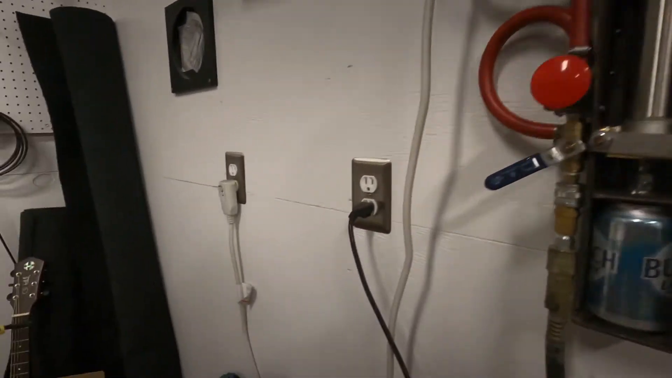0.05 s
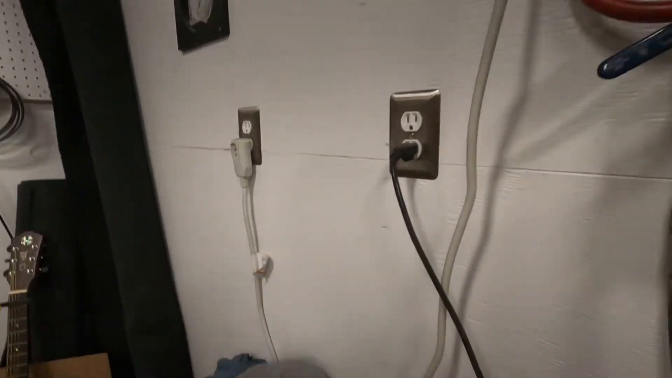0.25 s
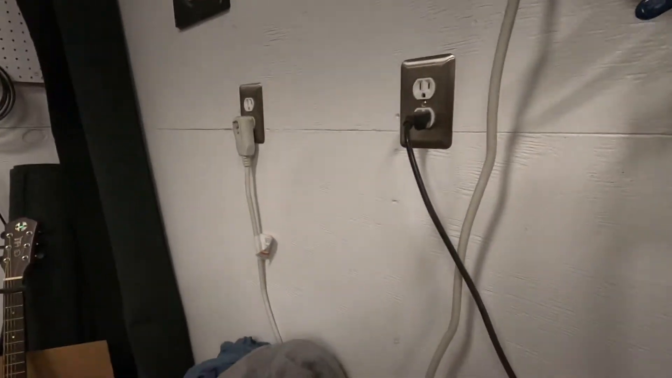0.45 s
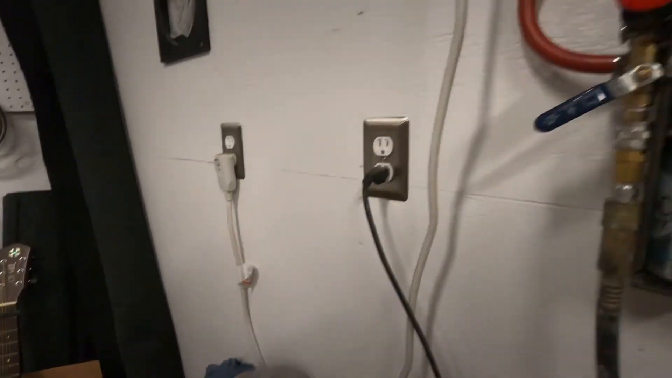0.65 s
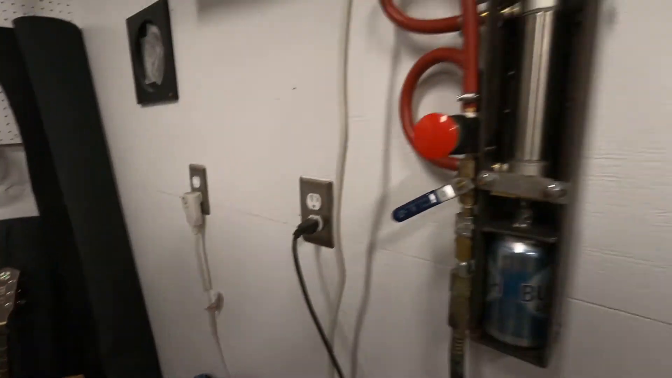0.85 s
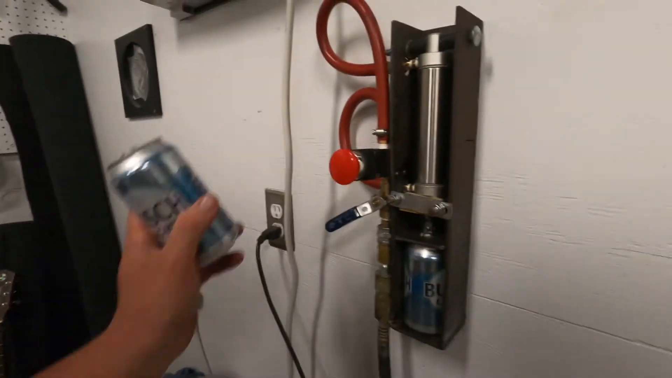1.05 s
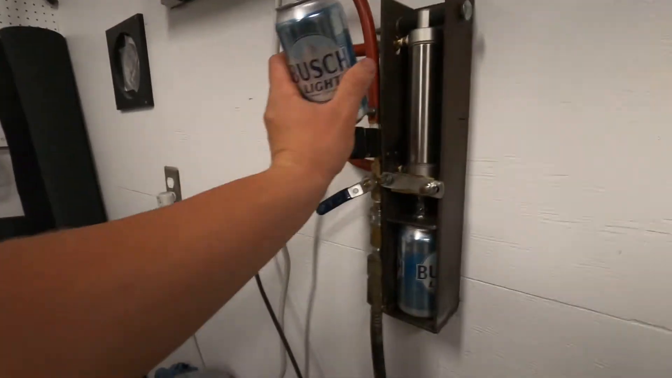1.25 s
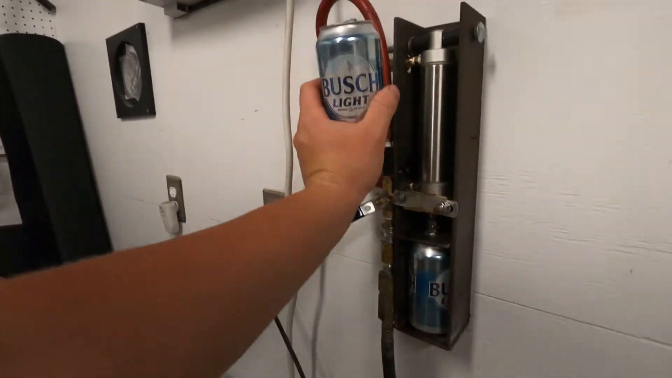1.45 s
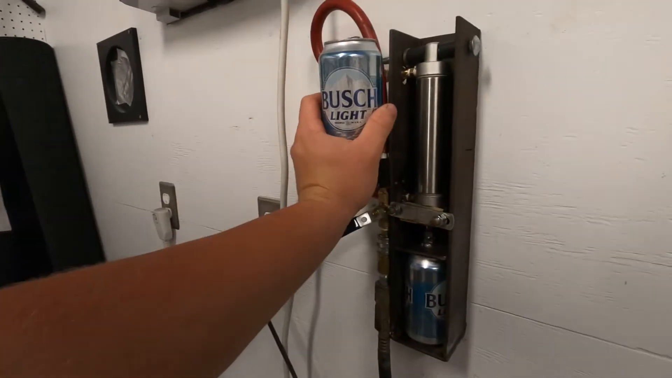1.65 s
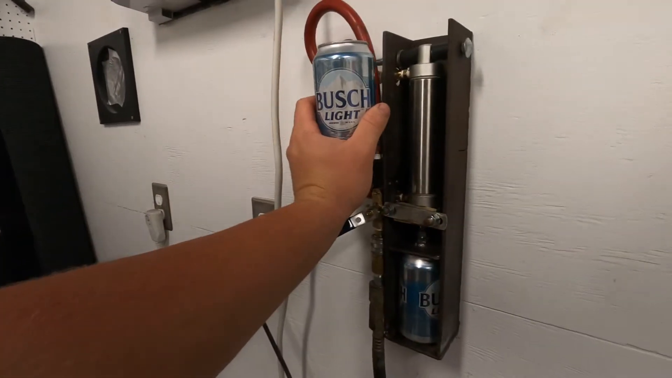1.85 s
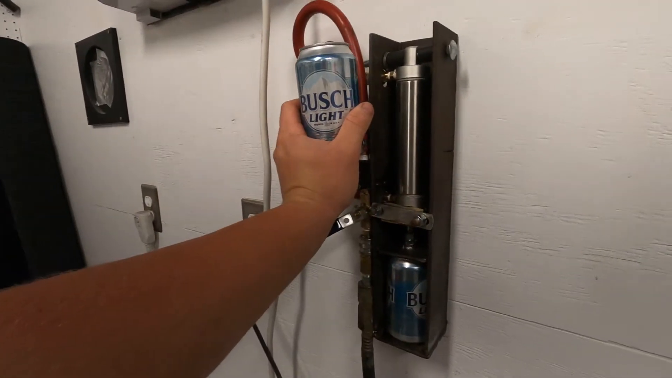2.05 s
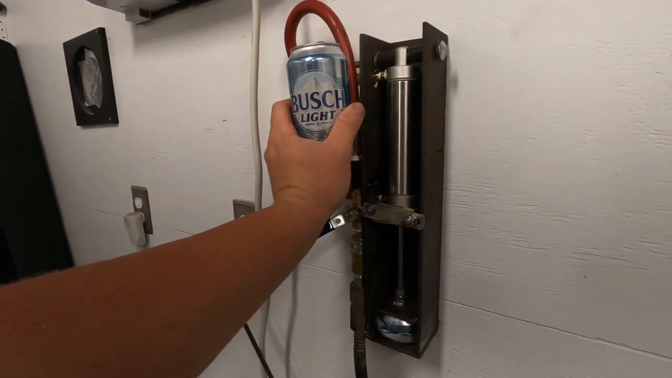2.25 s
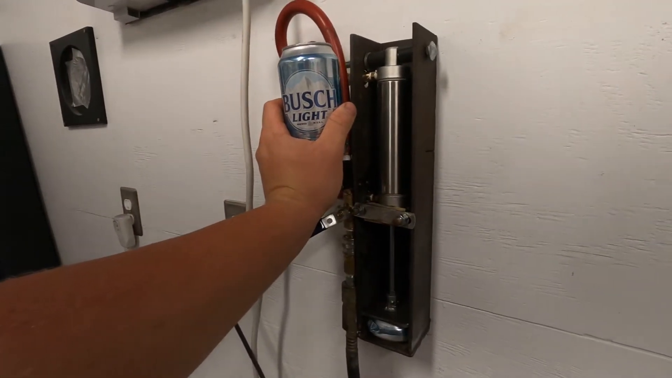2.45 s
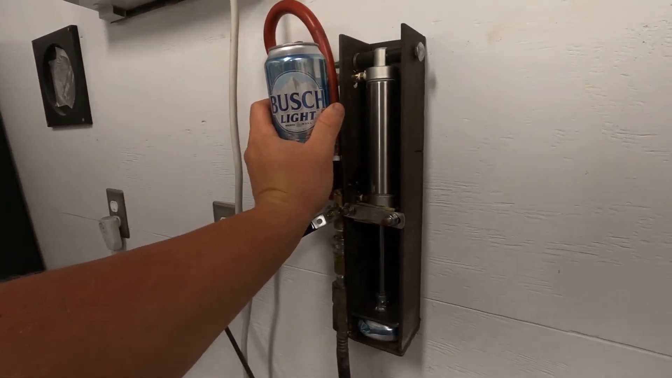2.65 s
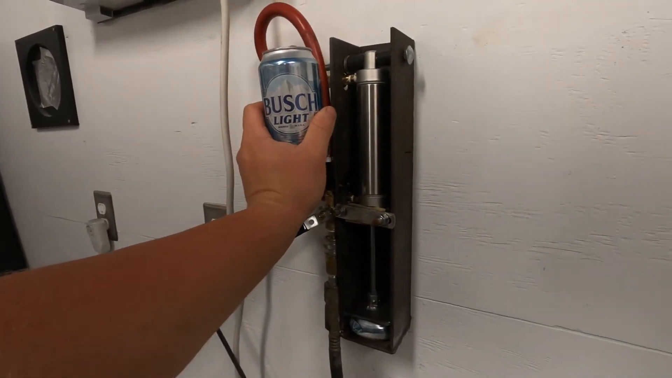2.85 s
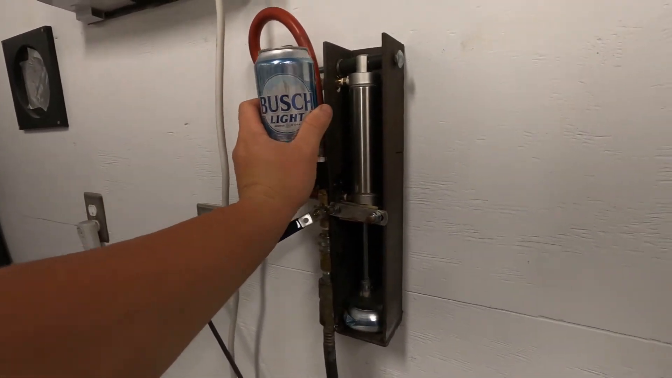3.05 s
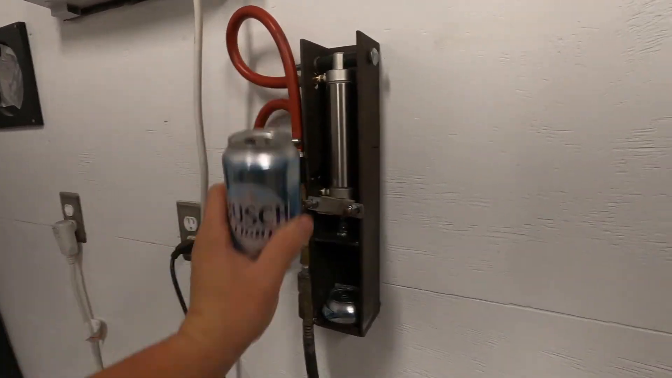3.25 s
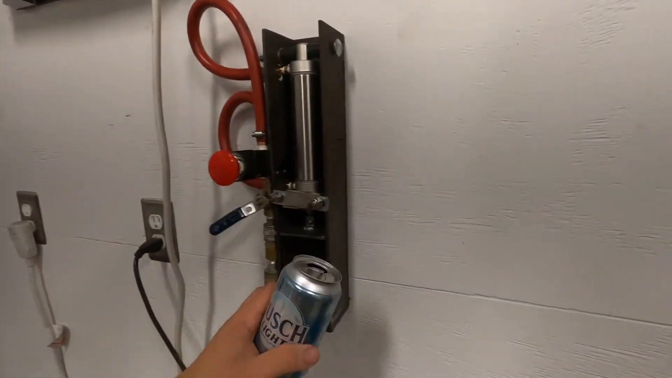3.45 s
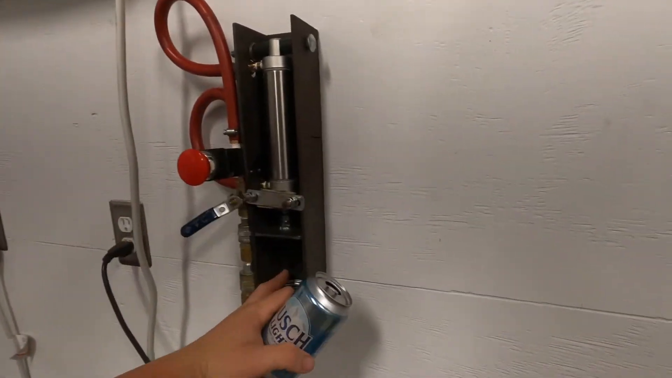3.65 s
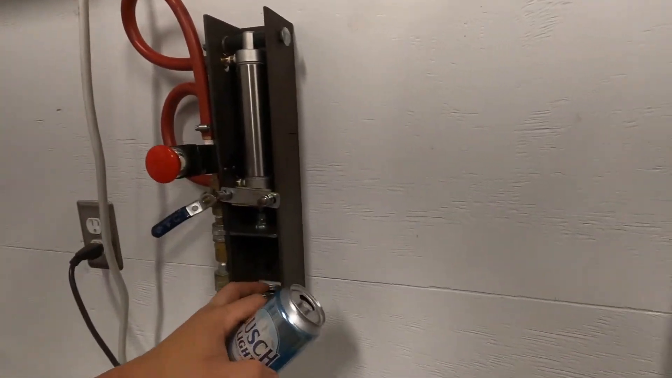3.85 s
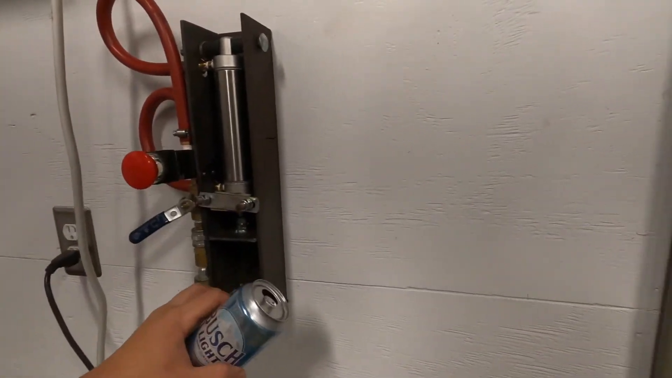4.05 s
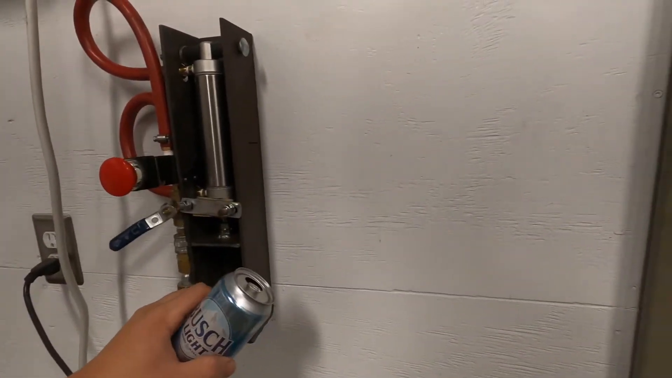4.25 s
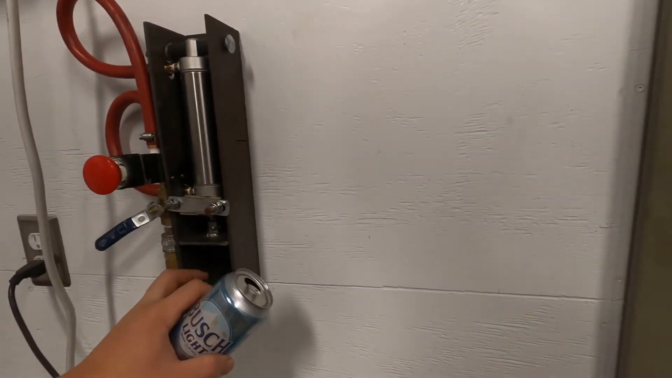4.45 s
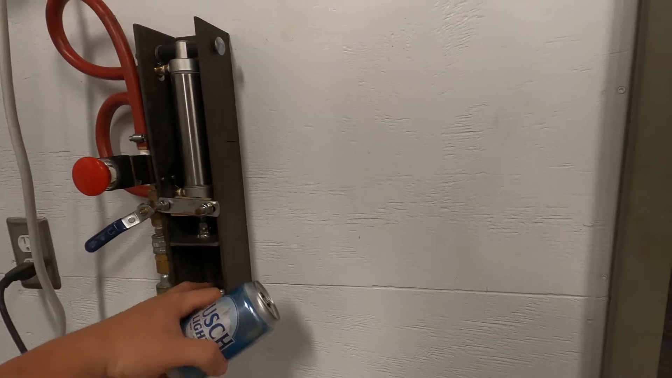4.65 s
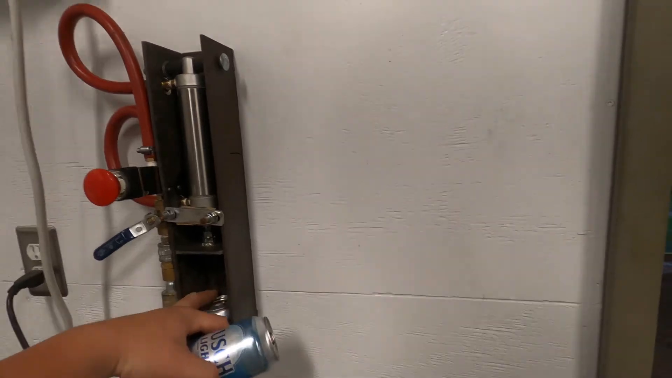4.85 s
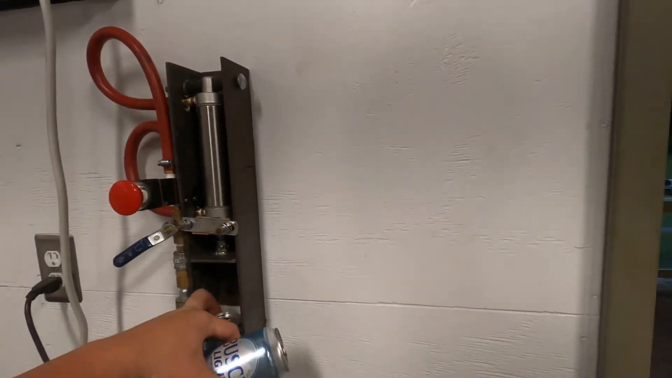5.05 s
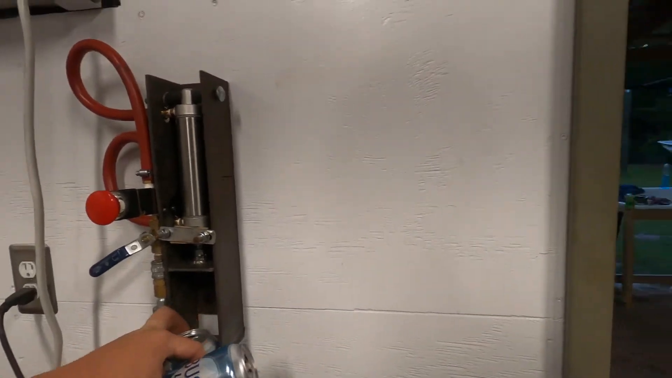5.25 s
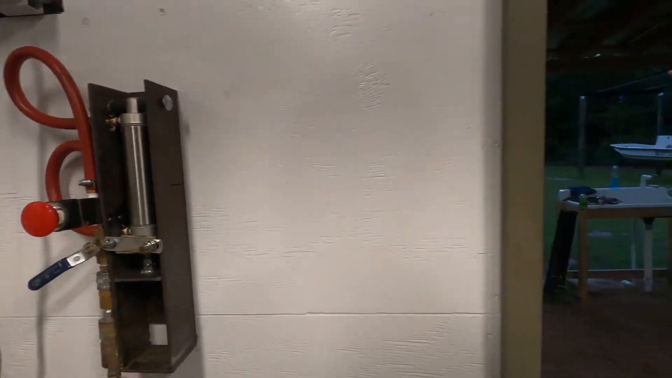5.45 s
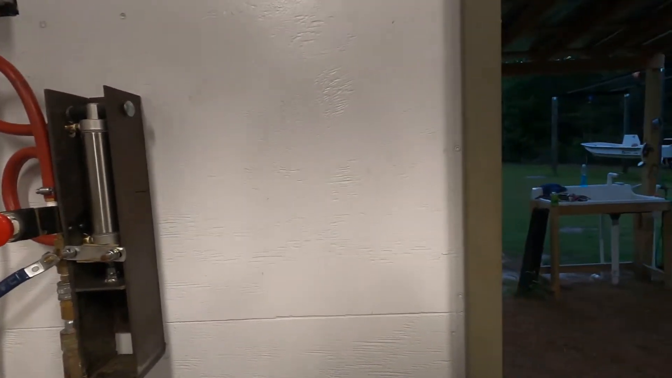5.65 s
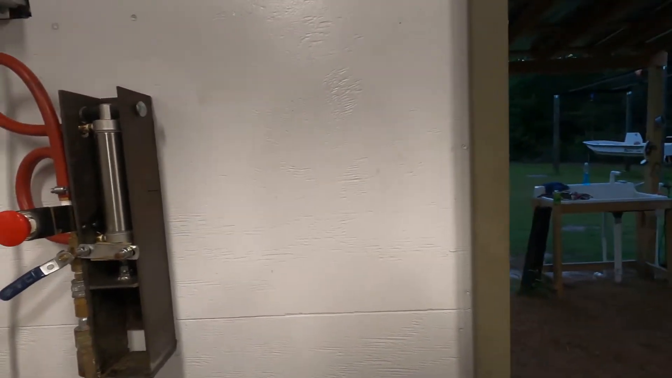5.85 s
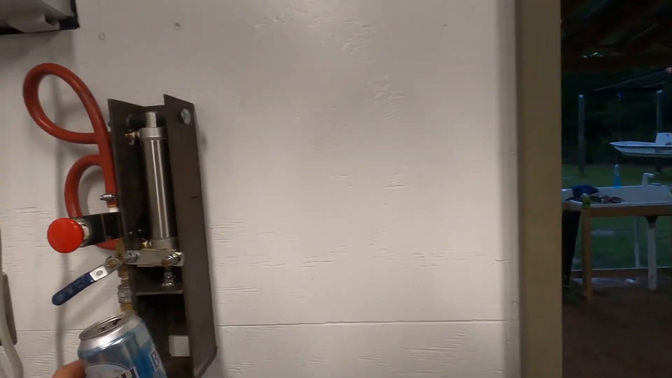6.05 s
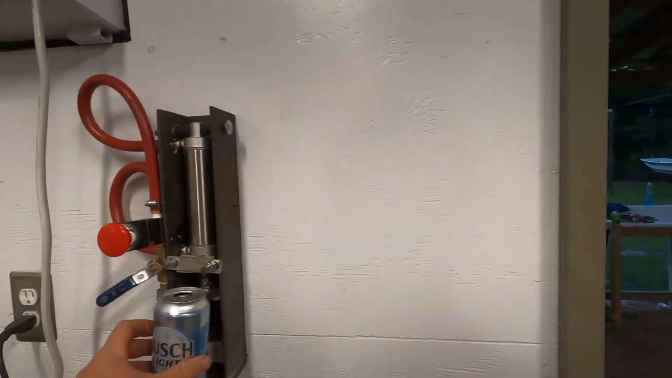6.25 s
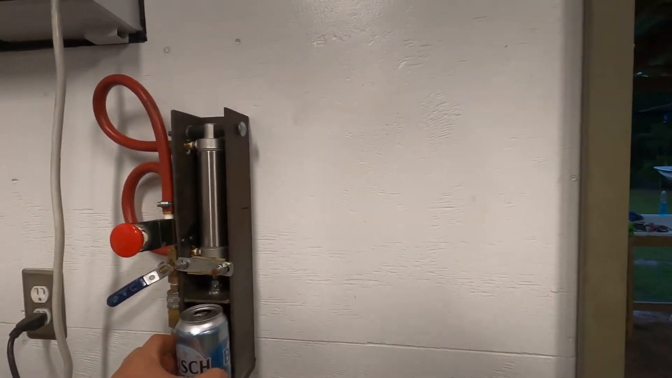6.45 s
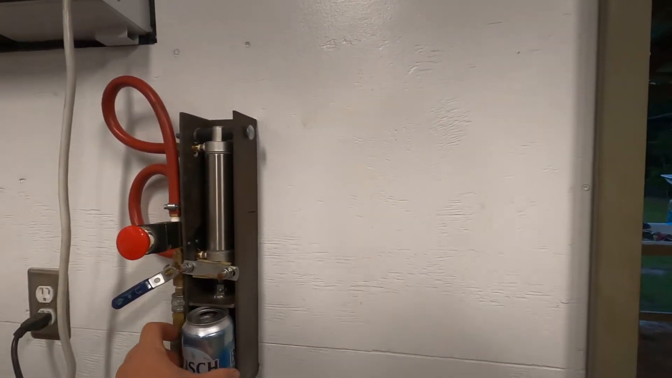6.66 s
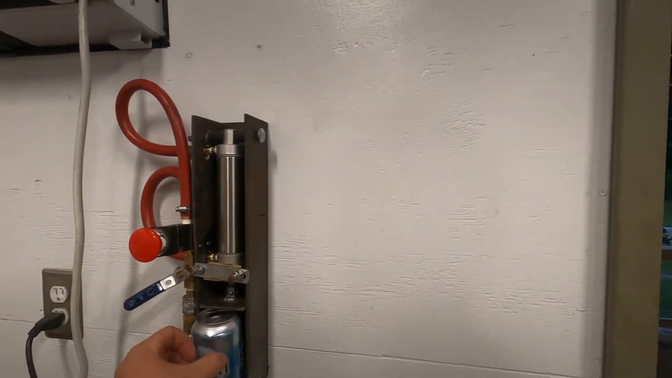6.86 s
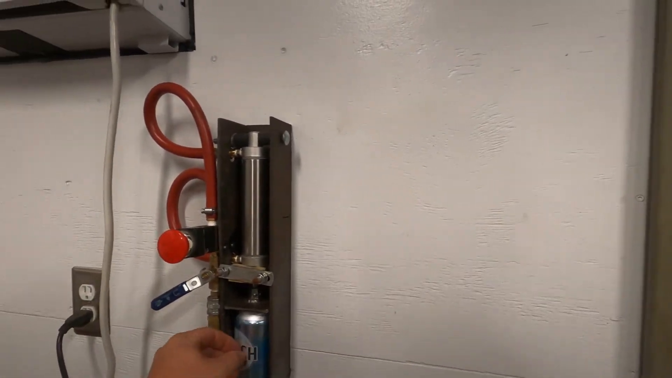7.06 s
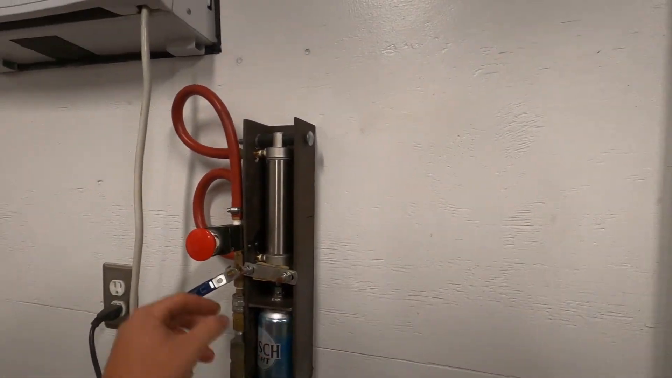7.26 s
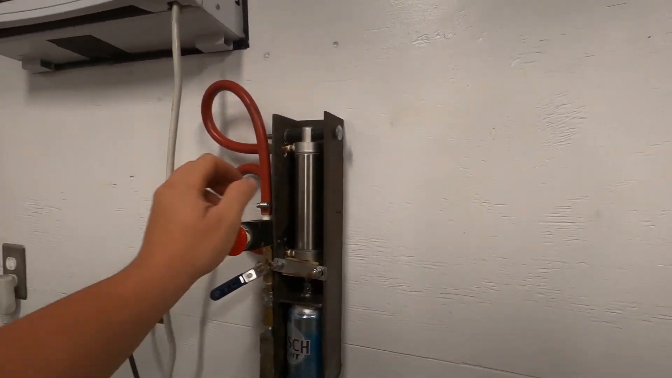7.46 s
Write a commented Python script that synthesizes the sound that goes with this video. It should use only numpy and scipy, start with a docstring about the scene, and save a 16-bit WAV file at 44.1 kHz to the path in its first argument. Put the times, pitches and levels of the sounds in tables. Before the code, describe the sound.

Two sharp air blasts surround the crunch of a drink can, followed by light metal scrapes and clatter in a workshop.

```python
"""Air-powered can crusher in a workshop

A hand-held stereo microphone, close to a wall-mounted air cylinder. Further off, a flat can lands in a bin.
The valve blasts, the ram buckles the next can and shakes the wall; a second blast, and it slams home.
The flat can is scraped out of the ringing steel frame and tossed in the bin; a fresh one squeaks in."""
import sys
import numpy as np
from scipy import signal
from scipy.fft import rfft, irfft
from scipy.io import wavfile

SR = 44100
rng = np.random.default_rng(int(sys.argv[2]) if len(sys.argv) > 2 else 0)


def int16_out(signal):
    """Quantize to a 16-bit WAV file."""
    q = np.round(np.clip(np.atleast_2d(signal).T, -1, 1) * 32767)
    wavfile.write(sys.argv[1], SR, q.astype(np.int16))


N = 331632
FREQ = np.fft.rfftfreq(N, 1 / SR)
TIME = np.arange(N) / SR

# The workshop's reverberation. Each row: frequency in Hz, t60 in seconds.
ROOM_T60 = [(100, 1.0), (250, 0.87), (700, 0.65), (2000, 0.68), (4000, 0.66), (8000, .55), (14000, 0.24)]
# Room tone: two noise spectra and faint electrical tones. Each row: frequency in Hz, relative level in dB.
HISS_COLOUR = [(150, -43), (250, -15), (537, -2), (636, -18), (925, -25), (1190, -6.5), (1620, -19),
               (1760, -9.5), (2440, -13), (2650, -3), (2990, -13.5), (4890, -3.5), (6420, -16.5),
               (9810, -14), (14500, -26.5)]
RUMBLE_COLOUR = [(12, -24), (20, -5), (51, -3), (182, -17), (221, -18), (247, -26.5), (300, -26.5),
                 (390, -38), (660, -120)]
WHINE_TONES = [(527.6, -70.5), (2595, -77), (2649, -72.5), (2708, -62)]
# The drift of the hiss, and gusts on the microphone. Each row: time in seconds, relative level in dB.
HISS_LEVEL = [(0, -50), (1.0, -45.5), (1.75, -52.5), (2.2, -61), (3.0, -58), (3.9, -58), (5.2, -50),
              (5.9, -51.5), (7.52, -49)]
GUSTS = [(0.02, -47), (0.8, -41), (1.3, -36), (2.45, -50), (3.5, -51), (4.9, -43), (5.56, -45)]
# Low thumps: handling, exhaust puffs, wall shudders, the piston's stop and the flat can's thuds.
# Each row: start in seconds, level in dB, length in seconds, top frequency in Hz.
THUMPS = [(0.066, -36, 0.007, 576), (1.308, -21.5, 0.024, 440), (1.355, -19.5, 0.018, 108),
          (1.811, -33, 0.045, 328), (2.231, -27.5, 0.075, 190), (3.141, -13, 0.02, 170),
          (3.236, -19, 0.016, 450), (3.249, -29, 0.11, 398), (5.031, -41, 0.088, 540),
          (5.979, -27, 0.045, 450)]

# Spectra of the cracks: heap in the bin, steel frame, whole can, its first pop, its buckling.
# Each row: frequency in Hz, relative level in dB.
HEAP_COLOUR = [(240, -24.5), (400, 3.5), (472, -14.5), (628, -9), (914, -7), (1130, -2.5), (2220, -10),
               (2860, -12), (4920, -27), (8320, -41), (12700, -54.5), (14500, -57)]
STEEL_COLOUR = [(210, -33.5), (350, -12.5), (541, -20), (751, -3.5), (1130, -2), (1420, -13), (2130, -8),
                (3200, -20), (3860, -19.5), (4720, -28), (5270, -26.5), (5780, -31.5), (8950, -36),
                (14500, -59)]
SHELL_COLOUR = [(240, -37), (400, -0.5), (574, -3.5), (900, -6), (1820, -0.5), (2950, -7), (3280, -13),
                (4110, -14.5), (4920, -21), (5540, -21), (7600, -25), (12500, -43), (14500, -44)]
POP_COLOUR = [(300, -26), (800, -17), (1300, -1), (1900, 2), (2800, 2), (4200, -6), (7000, -19),
              (14500, -35)]
BUCKLE_COLOUR = [(210, -30), (350, -1.5), (739, -2), (1690, 4.5), (2820, 0), (4100, -2), (4580, -7.5),
                 (5100, -8.5), (6450, -11.5), (7770, -14.5), (9230, -17), (12400, -27), (14500, -35)]
# What rings after a blow. Each row: frequency in Hz, relative level in dB, t60 in seconds.
HEAP_MODES = [(818, -2, .33), (1000, -1, .25), (1260, -9, .25), (1572, -8, .35), (2331, -9, .3),
              (2546, -12, .3), (2808, -11, .3)]
FRAME_MODES = [(732, -8, .3), (818, -6, .35), (919, 0, .4), (1000, -5, .2), (1082, -3, .22), (1141, 0, .25),
               (1238, -9, .3), (1674, -13, .2), (1900, -11, .15), (2370, -12, .18), (4050, -9, .04)]
CAN_MODES = [(571, -10, .3), (802, -8, .28), (1141, -12, .35), (1320, -11, .3), (1590, -10, .25),
             (1735, -4, .28), (1995, -5, .24), (2070, -6, .25), (3165, -13, .25), (4600, -15, .15)]
LID_MODES = [(856, -16, .3), (1715, 0, .3), (1873, -14, .3), (3165, -14, .35)]
BUCKLE_MODES = [(1230, 15, 0.29), (1730, 7, 0.224), (1970, -23, .2), (2340, 3.5, 0.28), (2850, 9, 0.2)]
WALL_MODES = [(71.6, -5, 1.0), (106, -3, 0.43), (116.7, 0, 1.3), (160.3, 7, 1.15), (200, 2, 0.7),
              (295, 5, 0.54), (396, 0, 0.53)]

# A flat can strikes the others in the bin. Each row: start in seconds, relative clatter in dB,
# length in seconds, brightness in dB/octave, relative thud in dB.
TUMBLES = [(0.3617, -28, 0.018, 3, -54), (0.382, -14.5, 0.006, 7, -29), (0.42, -18.5, 0.017, 5, -20),
           (0.474, -23.5, 0.0088, 5, -22), (6.1015, -14.5, 0.014, 5, -29), (6.113, -18, 0.0045, 2, -17),
           (6.161, -18, 0.007, 7, -14), (6.171, -14.5, 0.007, 0, -11), (6.186, -16, 0.02, 2.5, -16),
           (6.311, -32, 0.011, 7, -34), (6.3363, -27, 0.007, 4, -28)]
# The flat can scrapes on the frame and, in the last row, clips the bin's rim.
# Each row: start in seconds, relative level in dB, length in seconds, brightness in dB/octave.
SCRAPES = [(3.722, -30, 0.013, -1), (3.912, -25.5, 0.018, 0), (4.2904, -34.5, 0.003, 1.5),
           (4.303, -29, 0.009, -1.5), (4.385, -37.6, 0.01, -0.7), (4.461, -19.5, 0.011, -2.5),
           (4.551, -27, 0.0096, -4), (4.755, -37.5, 0.008, -2.5), (4.849, -33.5, 0.008, -1.5),
           (5.0255, -17.5, 0.012, 1.9), (5.11, -35, 0.016, 0.1), (5.1495, -33, 0.0036, 0.8),
           (5.342, -34.5, 0.014, -2), (5.9825, -20, 0.0042, 5)]
# A whole can is knocked or dented.
# Each row: start in seconds, relative crack in dB, length in seconds, relative hollow note in dB.
KNOCKS = [(0.745, -37.5, 0.007, -28.5), (1.297, -37, 0.0056, -38), (6.396, -22.5, 0.0035, -24.5),
          (6.5303, -24, 0.0068, -21.5), (6.7703, -32, 0.0047, -36), (6.7815, -25, 0.0026, -22.5),
          (6.9045, -35, 0.005, -27), (6.9624, -36, 0.0053, -26), (7.076, -22, 0.006, -27),
          (7.091, -17, 0.0042, -20), (7.102, -23, 0.0068, -30), (7.142, -22, 0.0073, -30),
          (7.2662, -20.5, 0.00475, -32), (7.2822, -14, 0.0037, -21)]
# Its rim is tapped. Each row: start in seconds, relative level in dB, brightness in dB/octave.
RIM_TAPS = [(1.3945, -25.5, 2.5), (1.421, -23, -3), (6.4725, -23, -4.5)]
# The ram meets the can, buckles it and at last hits its stop.
# Each row: start in seconds, relative crack in dB, length in seconds, relative boom in dB.
RAM_JERKS = [(2.1497, -14.6, 0.002, -12.6), (2.2225, -15, 0.008, -24), (2.236, -14.5, 0.009, -23),
             (2.245, -19, 0.006, -21), (2.281, -26, 0.004, -36), (2.296, -17, 0.006, -24),
             (2.305, -19.5, 0.005, -22), (2.321, -22.9, 0.002, -23), (2.361, -26, 0.008, -24),
             (2.3995, -23, 0.003, -31), (3.235, -21, 0.005, -11.5)]

# The jets at the two exhaust ports. Each row: frequency in Hz, relative level in dB.
OUT_COLOUR = [(240, -37), (400, -18), (900, -13), (1110, -5), (1410, -8), (1670, 0.5), (2250, -6.5),
              (3040, -2.5), (3590, 0.5), (4430, -1), (5070, -0.5), (6540, -9.5), (6840, -6.5), (10300, -16),
              (14500, -30)]
RETURN_COLOUR = [(240, -48), (400, 2.5), (741, -9), (1250, -3.5), (1410, 2), (1550, 0.5), (2860, -1.5),
                 (3380, -2), (3870, 0.5), (4920, -2), (6640, -8.5), (8070, -9), (14500, -27.5)]
# The ports' resonances. Each row: frequency in Hz, width in Hz, relative strength in dB.
OUT_PEAKS = [(3650, 300, 3.5), (4950, 300, -1), (6350, 300, -2), (10300, 600, -3)]
RETURN_PEAKS = [(3400, 280, 6), (5020, 200, 3), (7900, 700, -3)]

# A wide and a narrow stereo image. Each row: frequency in Hz, relative side level in dB.
WIDE_IMAGE = [(60, 7), (110, -3.5), (200, -3.5), (380, -5), (690, 2), (1270, -1), (2350, 3.5), (4330, 6.5),
              (7970, 10), (14700, 2)]
NARROW_IMAGE = [(60, -28), (110, -78.5), (200, -45.5), (380, -46.5), (690, -32.5), (1270, -59.5),
                (2350, -52.5), (4330, -30.5), (7970, -21.5), (14700, 0)]
# How much of the wide image is heard. Each row: time in seconds, gain in dB.
WIDE_LEVEL = [(0, -10), (1.45, -7.5), (1.8, -26.5), (7.3, -32), (7.52, -7)]

BOOM_HZ = 219  # note of the frame on the wall
SEATING_S = (6.975, 7.04)  # the fresh can passes from the hand into the frame
HOLLOW_HZ, KNOCK_TILT_DB = (368, 305), (-3, 3.8)  # air note and dB/octave: in the hand, in the frame


def amp(db):
    """Decibels to gain."""
    return 10 ** (np.asarray(db) / 20)


def unit_rms(x):
    """Scales to rms 1."""
    return x / np.sqrt(np.mean(x ** 2) + 1e-20)


def unit_blow(x):
    """Scales to the energy of 10 ms at rms 1."""
    return x * np.sqrt(SR / 100 / (np.sum(x ** 2) + 1e-20))


def read(points, hz):
    """Reads a table on a log-frequency axis."""
    f, value = np.transpose(points)
    return np.interp(np.log(hz + 1), np.log(f), value)


def curve(points):
    """A level curve as gain over time."""
    return amp(np.interp(TIME, *np.transpose(points)))


def add(mix, s, sound):
    """Mixes a sound in at time s."""
    part = mix[max(round(s * SR), 0):][:len(sound)]
    part += sound[:len(part)]


def noise(gain):
    """Noise of rms 1, shaped by a gain at each frequency."""
    return unit_rms(irfft(rfft(rng.standard_normal(N)) * gain, N))


def click(colour, tilt_db, size=2048):
    """A minimum-phase click of this colour, tilted by tilt_db per octave about 2 kHz."""
    hz = np.fft.rfftfreq(size, 1 / SR)
    db = read(colour, hz) + tilt_db * np.log2(np.clip(hz, 700, 9000) / 2000)
    cepstrum = irfft(np.log(amp(np.maximum(db, -90))))
    causal = cepstrum[:size // 2] * np.r_[.5, np.ones(size // 2 - 1)]
    return irfft(np.exp(2 * rfft(causal, size)))


def ring(modes, spread):
    """Dying modes, each excited and detuned a little differently by every blow."""
    longest = max(t60 for *_, t60 in modes)
    t = TIME[:int(SR * np.clip(longest, .1, 1))]
    out = np.zeros(len(t))
    for (hz, db, t60), (force, detune) in zip(modes, rng.uniform(-1.1, 1, (len(modes), 2))):
        phase = 2 * np.pi * hz * (1 + spread * detune) * t + np.pi * force
        out += amp(db + 2 * force - 60 * t / t60) * np.sin(phase)
    return unit_blow(out)


def crackle(length, snaps_per_s, fizz, swell):
    """Thin metal gives way in a shower of snaps that swells and dies."""
    t = TIME[:SR // 8]
    snaps = rng.standard_normal(len(t)) * (fizz + (rng.random(len(t)) < snaps_per_s / SR))
    snaps[0] = 2.5  # first contact
    age = t / length
    return snaps * np.exp(-(age / 1.25) ** 2) * (age + .041) / (age + .018 + swell)


def blows(rows, colour, modes, ring_db, snaps_per_s, fizz, spread, swell):
    """Each blow is a crackle in the metal's colour; the metal rings on from halfway through it."""
    out = np.zeros(N)
    for s, db, length, tilt_db, *_ in rows:
        crack = signal.fftconvolve(crackle(length, snaps_per_s, fizz, swell), click(colour, tilt_db))
        add(out, s, amp(db) * unit_blow(crack))
        add(out, s + length / 2, amp(db + ring_db) * ring(modes, spread))
    return out


def booms(rows, rise, t60, thud_db, depth):
    """The low note under each blow swells and dies, with a dull thud reaching down to depth * pitch."""
    out, t = np.zeros(N), TIME[:SR // 2]
    envelope = (1 - np.exp(-t / rise)) ** 2 * amp(-60 * t / t60)
    for s, *_, db, hz in rows:
        note = unit_blow(np.sin(2 * np.pi * hz * t) * envelope)
        band = signal.butter(2, [hz * depth, hz * 2], "band", fs=SR, output="sos")
        thud = unit_blow(signal.sosfilt(band, rng.standard_normal(len(t)) * np.exp(-t / .0096)))
        add(out, s, amp(db) * unit_blow(note + amp(thud_db) * thud))
    return out


def room(x, wet_db, early_db):
    """A few echoes off the workshop's near walls, then a diffuse tail that dies faster in the treble."""
    fade_in = np.clip(TIME[:SR] / .015 - .5, 0, 1)
    echoes = rng.standard_normal(SR) * (rng.random(SR) < 8000 / SR) * fade_in
    hz, t, spectra = signal.stft(echoes, SR, nperseg=256)
    tail = signal.istft(spectra * amp(-60 * t / read(ROOM_T60, hz)[:, None]), SR, nperseg=256)[1]
    tail *= amp(wet_db) / np.sqrt(np.mean(abs(rfft(tail, SR)[500:5000]) ** 2))
    for delay, sign in zip(rng.uniform(.002, .02, size=8), rng.choice([-1, 1], size=8)):
        add(tail, delay, np.array([sign * amp(early_db) / np.sqrt(8)]))
    return x + signal.fftconvolve(x, tail)[:N]


def rumble(steady_db=-57, rise_s=.05, fall_s=.16):
    """Slow air moves over the microphone, with a gust at each swing of the hand."""
    gusts = sum(amp(db) * np.exp(-np.maximum((s - TIME) / rise_s, (TIME - s) / fall_s))
                for s, db in GUSTS)
    return noise(amp(read(RUMBLE_COLOUR, FREQ))) * np.hypot(amp(steady_db), gusts)


def room_tone():
    """Hiss and a faint wavering electrical whine over low rumble."""
    waver = .00292 * np.cumsum(noise(1 / (1 + (FREQ / 8) ** 4))) / SR
    whine = sum(amp(db) * np.sqrt(2) * np.sin(2 * np.pi * hz * (TIME + waver)) for hz, db in WHINE_TONES)
    hiss = noise(amp(read(HISS_COLOUR, FREQ))) * curve(HISS_LEVEL)
    return amp(-4) * whine + amp(-5.2) * hiss + rumble()


def thumps():
    """Low thumps swell and fade: handling, exhaust, wall shudders, the piston's stop, flat-can thuds."""
    out = np.zeros(N)
    for s, db, length, top_hz in THUMPS:
        band = signal.butter(3, [top_hz / 6, top_hz], "band", fs=SR, output="sos")
        low_noise = unit_rms(signal.sosfilt(band, rng.standard_normal(SR)))
        age = 2 * TIME[:SR] / length
        add(out, s, amp(db) * low_noise * age * np.exp(1 - age))
    return out


def can_bin(deep_hz=158, upper_hz=360, rattle_gap_s=.018):
    """Cans strike and rattle to rest in the bin, further from the microphone and so with more room."""
    rattles = []
    for s, db, length, tilt_db, _ in TUMBLES:
        delays = np.cumsum(rattle_gap_s * (.5 + rng.random(size=3)))
        rattles += [(s + length + delay, db - 13 - 3 * k, .005, tilt_db) for k, delay in enumerate(delays)]
    clatter = blows(TUMBLES + rattles, HEAP_COLOUR, HEAP_MODES,
                    ring_db=-7.5, snaps_per_s=1500, fizz=.26, spread=.01, swell=.15)
    hardest = max(db for *_, db in TUMBLES)
    deep = [(s, hardest + 1.8 * (db - hardest), deep_hz) for s, *_, db in TUMBLES]  # needs a hard landing
    upper = [(s, db, upper_hz * rng.uniform(.85, 1.15)) for s, *_, db in TUMBLES]
    thuds = booms(deep + upper, rise=.0029, t60=.25, thud_db=1.5, depth=.62)
    return room(amp(-2.95) * clatter + amp(-7.5) * thuds, wet_db=-4.5, early_db=-6.5)


def flat_can(slip_after_s=.036, slip_s=.014):
    """The flat can scrapes on the frame, then clips the bin's rim; each contact bumps faintly and slips."""
    slips = [(s + slip_after_s * rng.uniform(.8, 1.2), db - 12.5, slip_s, tilt_db)
             for s, db, _, tilt_db in SCRAPES]
    ticks = [(s, -44, slip_s, 2) for s in rng.uniform(4.16, 4.92, size=6)]  # fingers work it loose
    scrape = blows(SCRAPES + slips + ticks, STEEL_COLOUR, FRAME_MODES,
                   ring_db=-3, snaps_per_s=3200, fizz=.16, spread=.016, swell=.6)
    bump = booms([(s, db, BOOM_HZ) for s, db, *_ in SCRAPES], rise=.004, t60=.25, thud_db=2, depth=.5)
    return room(amp(-1.7) * scrape + amp(-18) * bump, wet_db=-8, early_db=-7)


def seated(s, ends):
    """A property of the whole can, passing from its value in the hand to its value in the frame."""
    return np.interp(s, SEATING_S, ends)


def resonate(x, hz, width_hz):
    """A resonance that follows a moving frequency."""
    carrier = np.exp(2j * np.pi * np.cumsum(hz) / SR)
    pole = np.exp(-np.pi * width_hz / SR)
    envelope = signal.lfilter([(1 - pole) ** 2], [1, -2 * pole, pole * pole], x / carrier)
    return unit_rms((carrier * envelope).real)


def slide(touch_s=6.975, push_s=7.016, stop_s=7.112, ramp_s=.012):
    """The fresh can slides in: tiny slips of its rim stir the hollow note, a squeak and a bright rasp."""
    touch, push, stop = (np.clip((TIME - s) / ramp_s, 0, 1) for s in (touch_s, push_s, stop_s - ramp_s))
    pushed_s = np.clip(TIME - push_s, 0, stop_s - push_s)
    slips = rng.standard_normal(N) * (.17 + (rng.random(N) < 1200 / SR))
    hollow = resonate(slips, seated(TIME, HOLLOW_HZ), width_hz=47)
    squeak = resonate(slips, 660 * 2 ** (17 * pushed_s), width_hz=700)  # climbs as the can gains speed
    rasp = resonate(slips, np.full(N, 5000.), width_hz=2800)
    level = amp(-32.5) * (touch - push) + amp(-22.5 - 45 * pushed_s) * push
    return (hollow + amp(-2) * squeak + amp(-7.5) * rasp) * level * (1 - stop)


def whole_cans(tap_s=.0028):
    """Close up, knocks ring the thin shell and the air inside, taps ring the lid, and a can slides in."""
    knocks = [(s, db, length, seated(s, KNOCK_TILT_DB), note_db, seated(s, HOLLOW_HZ))
              for s, db, length, note_db in KNOCKS]
    in_hand = [knock for knock in knocks if knock[0] < SEATING_S[1]]
    in_frame = [knock for knock in knocks if knock[0] >= SEATING_S[1]]
    taps = [(s, db, tap_s, tilt_db, db - 10, BOOM_HZ) for s, db, tilt_db in RIM_TAPS]
    seated_modes = [mode for mode in CAN_MODES if mode[0] > 1200]  # the frame stops the lower ones
    thin = dict(snaps_per_s=3000, fizz=.08, spread=.002, swell=.06)
    shell = blows(in_hand, SHELL_COLOUR, CAN_MODES, ring_db=-9, **thin)
    shell += blows(in_frame, SHELL_COLOUR, seated_modes, ring_db=-9.5, **thin)
    lid = blows(taps, SHELL_COLOUR, LID_MODES, ring_db=-9.5, **thin)
    hollow = booms(knocks + taps, rise=.00075, t60=.14, thud_db=-3, depth=.25)
    return room(amp(-.5) * (shell + hollow) + lid + slide(), wet_db=-9, early_db=-11)


def blast(colour, peaks, opens_s, rise_s, hold_s, db, sag_db_s, release_db_s):
    """A jet opens, sags and shuts; it hisses through the port and dulls as the pressure falls."""
    resonances = sum(2 * amp(2 * peak_db) / (1 + (2 * (FREQ - centre) / width) ** 2)
                     for centre, width, peak_db in peaks)
    jet = noise(amp(read(colour, FREQ)) * np.sqrt(1 + resonances))
    hz, t, spectra = signal.stft(jet, SR, nperseg=256)
    tilt_db = 5.2 - 20 * np.clip(t - opens_s, 0, hold_s)  # per octave
    spectra *= amp(tilt_db * np.log2(np.maximum(hz, 1500) / 4000)[:, None])
    age = np.maximum(TIME - opens_s, 0)
    opening = np.minimum(age / rise_s, 1) ** 5  # the valve leaks first, then snaps open
    fall_db = np.minimum(sag_db_s * age + release_db_s * np.maximum(age - hold_s, 0), 200)
    return signal.istft(spectra, SR, nperseg=256)[1][:N] * opening * amp(db - fall_db)


def valve():
    """Exhaust blasts for the out stroke and the return; the last air bleeds off once the piston is home."""
    air = blast(OUT_COLOUR, OUT_PEAKS,
                opens_s=1.789, rise_s=.033, hold_s=.22, db=-15.3, sag_db_s=55, release_db_s=240)
    air += blast(RETURN_COLOUR, RETURN_PEAKS,
                 opens_s=3.1, rise_s=.035, hold_s=.141, db=-14, sag_db_s=58, release_db_s=1200)
    air += blast(RETURN_COLOUR, [],
                 opens_s=3.23, rise_s=.11, hold_s=.16, db=-28.5, sag_db_s=22, release_db_s=125)
    return room(amp(1.5) * air, wet_db=-7, early_db=-21.5)


def ram(crush_s=(2.15, 2.4), tilt_db=(-1.5, 2)):
    """The can buckles in jerks, brighter as it flattens; each booms through the frame into the wall."""
    jerks = [(s, db, length, np.interp(s, crush_s, tilt_db), boom_db, BOOM_HZ)
             for s, db, length, boom_db in RAM_JERKS]
    crumple = dict(ring_db=-19, snaps_per_s=3800, fizz=.12, spread=.041, swell=.85)
    out = blows(jerks[:1], POP_COLOUR, BUCKLE_MODES, **crumple)  # the still round can pops first
    out += blows(jerks[1:], BUCKLE_COLOUR, BUCKLE_MODES, **crumple)
    add(out, .007, amp(-2) * booms(jerks, rise=.012, t60=.08, thud_db=-10, depth=.45))
    for s, *_, boom_db in RAM_JERKS:
        add(out, s + .00973, amp(boom_db - 11) * ring(WALL_MODES, spread=.0266))
    return room(out, wet_db=-7, early_db=-15.5)


def scatter(x, image, seconds):
    """The side signal between the microphone's two ports: the same sound, scrambled over a short time."""
    smear = rfft(rng.standard_normal(SR) * np.exp(-TIME[:SR] / seconds), N)
    smear /= np.sqrt(np.mean(abs(smear) ** 2))
    return irfft(rfft(x) * smear * amp(read(image, FREQ)), N)


def scene():
    """At the microphone the image starts wide, narrows below the top treble and reopens at the very end."""
    mid = valve() + ram() + whole_cans() + flat_can() + can_bin() + thumps() + room_tone()
    side = scatter(mid, WIDE_IMAGE, seconds=.0067) * curve(WIDE_LEVEL)
    side += scatter(mid, NARROW_IMAGE, seconds=.0013)
    return np.array([mid + side, mid - side])


def record(dry):
    """The recorder rounds off peaks near full scale, then cuts the treble above 14.45 kHz."""
    held = dry / (1 + dry ** 6) ** (1 / 6)
    lowpass = signal.firwin(511, 14450, window=("kaiser", 9), fs=SR)
    return signal.oaconvolve(held, lowpass[None], "same")


dry = scene()
out = record(dry)
int16_out(out)
```